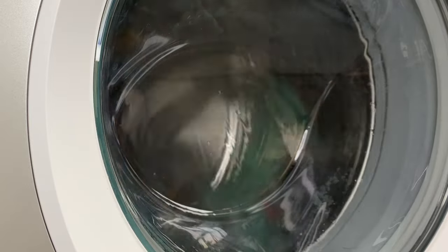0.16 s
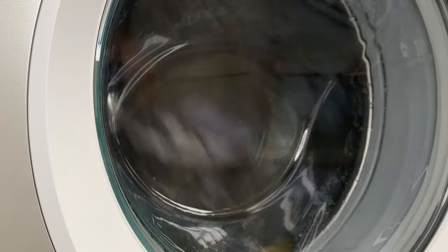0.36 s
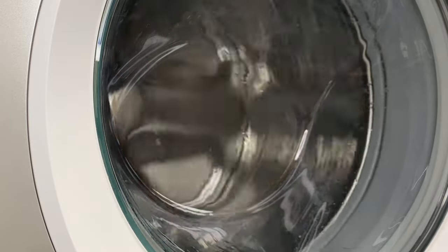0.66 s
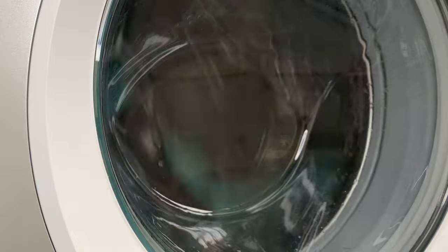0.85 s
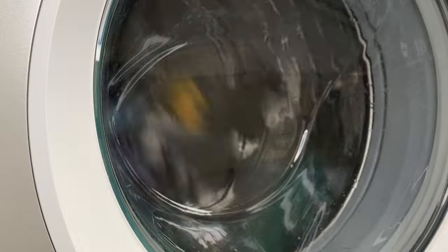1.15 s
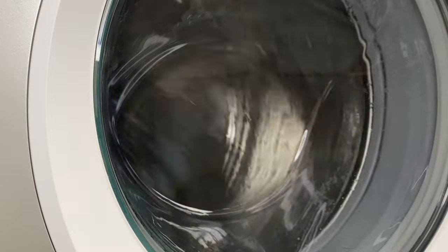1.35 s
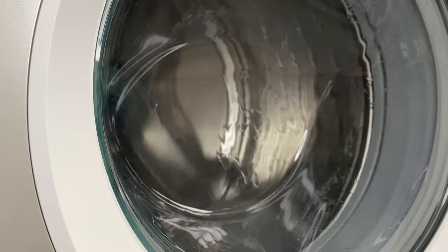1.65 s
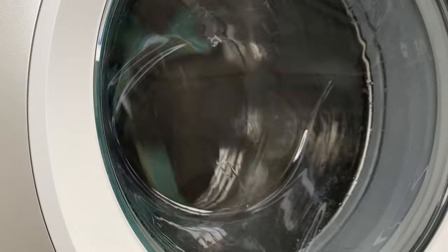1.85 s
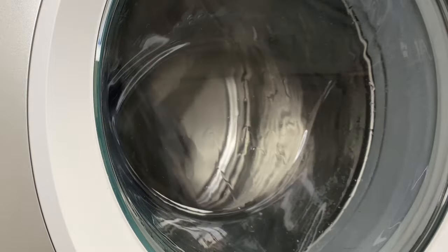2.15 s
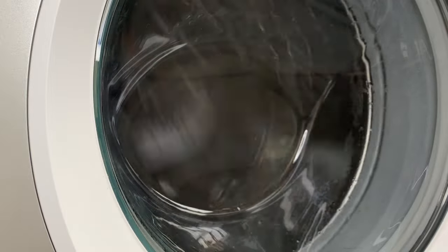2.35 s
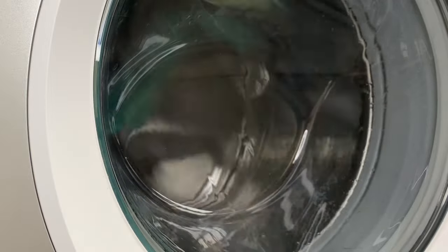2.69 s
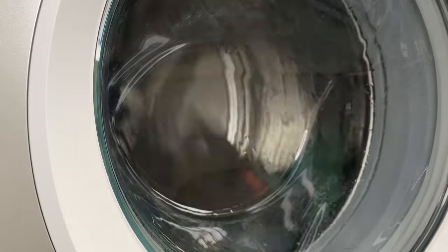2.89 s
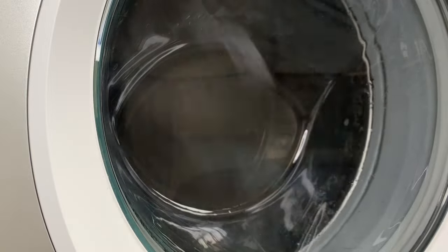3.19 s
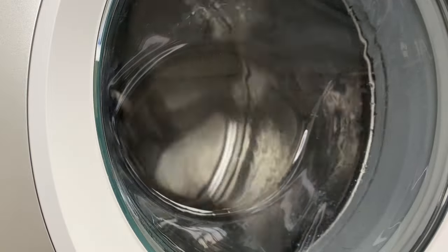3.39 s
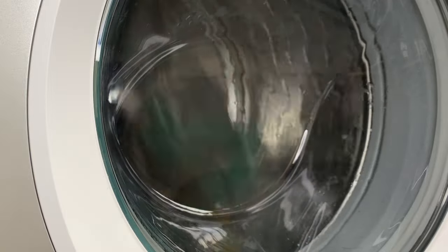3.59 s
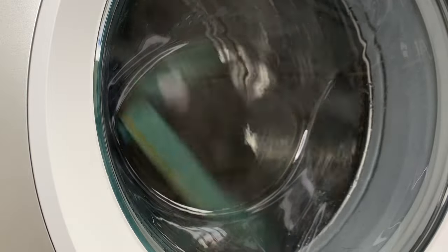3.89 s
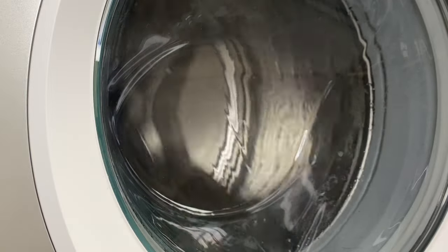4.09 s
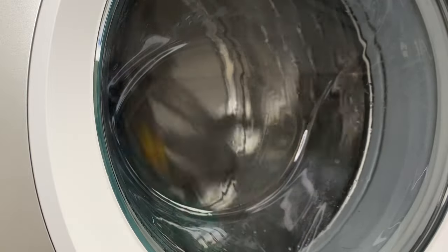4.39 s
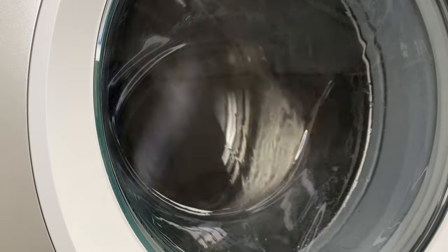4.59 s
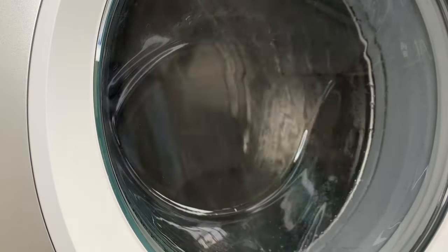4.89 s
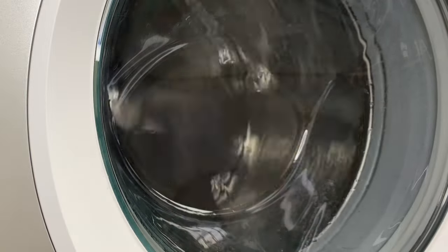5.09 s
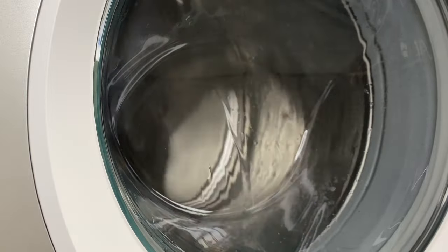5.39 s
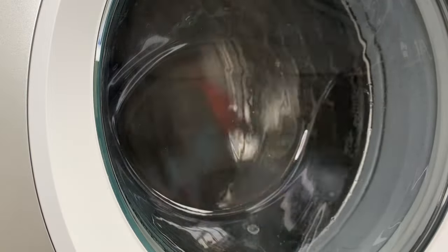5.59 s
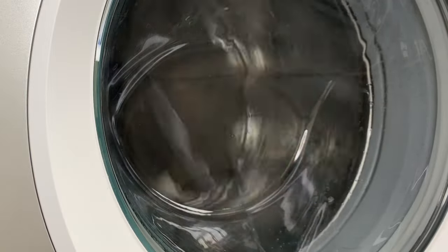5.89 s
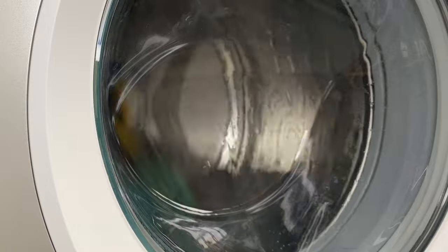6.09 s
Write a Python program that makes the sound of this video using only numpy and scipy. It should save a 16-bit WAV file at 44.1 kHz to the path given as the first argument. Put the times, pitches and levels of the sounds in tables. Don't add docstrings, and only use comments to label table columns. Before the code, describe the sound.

A washing machine is heard from very close to its door, already in mid-wash and continuing throughout about six seconds. A quiet, low motor hum stays constant beneath rolling, hollow water. Paddles lift and tip water a little more than twice a second, giving brief soft hisses of spray. From 0 to 1 second, bundles flop and splash in quick irregular succession. Firm wet slaps land around 1.4 to 1.5 seconds, then a heavy soft surge with a deep thud near 2.0, followed by more sloshing to 2.5. Cloth surges again around 2.8 and 3.3, with a splash near 3.7. Sharper slaps arrive around 4.05, 4.7 and 5.0; the strongest, with a dull low pop, hits near 5.2. Another slap follows at 5.6, and tumbling continues to the end. Bubbles gurgle and droplets plink throughout, while the cabinet rumbles with each lurch.

```python
import sys
import numpy as np
from scipy import signal
from scipy.fft import rfft, irfft, next_fast_len
from scipy.io import wavfile
from scipy.ndimage import uniform_filter1d, map_coordinates

SR = 44100
rng = np.random.default_rng(int(sys.argv[2]) if len(sys.argv) > 2 else 0)


def bounce(signal):
    frames = np.transpose(np.atleast_2d(signal))
    limited = np.clip(frames, -1, 1)
    pcm = np.round(limited * 32767).astype(np.int16)
    wavfile.write(sys.argv[1], SR, pcm)


def field_ratio(decibels):
    return 10 ** (np.asarray(decibels, dtype=float) / 20)


N = 275625

# [f/Hz, width/Hz, level/dB]
MOTOR_MODES = [(50, 32, -8.5), (83.7, 4, -2), (96, 4.7, -15), (155, 18, -1.5), (202.7, 16.4, -2.5)]
# f/Hz, width/Hz, level/dB
DRIVE_WHINE = (10720, 55, -78)
# [t/s, level/dB]
CHURN_LEVEL = [(0, -32.5), (.45, -41), (.66, -43), (0.951, -37), (1.15, -36.5), (1.34, -41), (1.76, -38),
               (2.22, -37), (2.62, -38.5), (3.049, -41), (3.45, -39), (3.8, -36), (4.2, -40.5),
               (4.62, -37.5), (5.02, -36), (5.44, -40), (5.85, -36), (6.25, -41)]
# [t/s, length/s, level/dB]
PADDLE_SHOWERS = [(0, 0.58, -52.5), (0.79, 0.16, -55.5), (1.022, 0.22, -53.5), (1.388, 0.25, -51),
                  (1.788, 0.35, -52.5), (2.261, .27, -48.5), (2.608, 0.28, -54), (3.006, .08, -66),
                  (3.156, .23, -51), (3.49, 0.2, -53), (3.84, 0.309, -53), (4.224, 0.32, -52),
                  (4.666, 0.27, -52.5), (5.021, 0.36, -53), (5.52, 0.29, -58.5), (5.85, 0.34, -51.5)]
# [f/Hz, level/dB per Hz]
MIST_TONE = [(4000, -25), (6000, -3), (7500, 0), (9500, 0), (12200, -2), (12900, -5), (13300, -14),
             (14000, -14), (14600, -13), (15000, -17), (15300, -24), (15700, -22)]
# [f/Hz, level/dB per Hz]
SPRAY_TONE = [(900, -18), (1500, 10), (2000, 6), (3000, 1), (4000, -9), (5200, -11.5), (5700, -16.5),
              (7000, -23), (9000, -42)]
# level/dB of slap, surge, splash
SPIT_LEVEL = (-46.5, -46.5, -43.5)
# t/s of slap, surge, splash
SPIT_RISE = (0.0009, 0.019, 0.01)
# [t/s, level/dB, t60/s]
DRUM_LURCHES = [(0.049, -19.5, 0.22), (0.418, -25.5, 0.49), (0.551, -31.5, 0.32), (0.833, -37, 0.35),
                (1.029, -27, 0.33), (1.419, -23.5, 0.55), (1.528, -26, 0.35), (2.031, -14, 0.38),
                (2.283, -30, 0.45), (2.42, -23.5, 0.63), (2.558, -36.5, 0.44), (2.741, -27, 0.45),
                (3.202, -23.5, 0.51), (3.313, -24, 0.26), (3.504, -32, 0.35), (3.677, -31.5, 0.35),
                (3.904, -23, 0.31), (4.058, -20, 0.23), (4.138, -27, 0.31), (4.31, -33, 0.35),
                (4.769, -25, 0.35), (4.941, -23, 0.29), (5.181, -16.5, 0.49), (5.261, -27, 0.31),
                (5.662, -24, 0.35), (5.88, -23, 0.35), (6.061, -21, 0.39), (6.138, -31, 0.3)]
# [f/Hz, width/Hz, level/dB]
CABINET_MODES = [(62, 14, -8), (79.5, 8, 0), (99.5, 6, 0), (125, 9, -10)]
# [f/Hz, width/Hz, level/dB]
TUB_MODES = [(160, 11, -7), (195, 30, -10), (227, 13, 0), (282, 14, -5), (327, 15, -6)]
# [f/Hz, width/Hz, level/dB]
DOOR_MODES = [(376, 25.7, -1.5), (460.3, 44.5, 0.5), (567, 40.7, -0.5), (615.4, 22.5, 1.5), (700, 39, -2.5),
              (758, 28, -1.5), (845, 58, -3.5), (947.5, 45, -1), (1029, 32, -3), (1110.6, 28, -2.5),
              (1254, 193, -8), (1593, 370, -16)]
# [t/s, level/dB, trapped air f/Hz, t60/s]
WATER_SHEETS = [(.059, -24.5, 506, .28), (.199, -14.5, 850, 0.14), (.498, -15.5, 840, 0.13),
                (.531, -20.5, 664, 0.19), (.825, -19, 1115, .25), (.97, -26.5, 700, 0.067),
                (1.15, -37, 700, .3), (1.411, -14, 1440, 0.21), (1.629, -16, 748, 0.25),
                (1.713, -32.5, 420, 0.13), (1.79, -30.5, 825, 0.46), (1.888, -21.5, 636, 0.35),
                (2.29, -16.5, 1240, 0.24), (2.53, -21.5, 600, 0.16), (2.992, -25, 997, 0.41),
                (3.16, -26.5, 700, 0.39), (3.596, -19, 593, 0.25), (3.64, -28, 700, 0.31),
                (3.679, -14.5, 551, 0.17), (3.83, -27, 700, 0.75), (3.999, -19.5, 374, 0.36),
                (4.26, -16, 700, 0.15), (4.446, -17, 1286, 0.23), (4.53, -21, 700, 0.16),
                (4.789, -18, 580, 0.27), (4.849, -17.5, 608, 0.23), (5.1, -24, 700, 0.56),
                (5.52, -25.5, 800, 0.9), (5.73, -21.5, 700, 0.12), (5.787, -31, 702, 0.099)]
# [t/s, level/dB, trapped air f/Hz, tub thud level/dB, t60/s]
CLOTH_SURGES = [(.029, -17.5, 429, -21, 0.56), (.389, -22.5, 800, -2, 0.54), (.849, -14, 585, -15, 0.11),
                (1.018, -15, 561, -2.5, 0.23), (1.095, -19, 403, -3, 0.07), (1.959, -14.5, 385, -24, 0.15),
                (1.998, -13.5, 590, 4, 0.29), (2.029, -16, 416, -35, 0.22), (2.139, -16, 410, -11, 0.17),
                (2.207, -21, 530, -14, .2), (2.329, -36.5, 401, 20, 0.84), (2.389, -15, 645, -23, 0.29),
                (2.429, -13, 566, -11.5, 0.27), (2.76, -28, 600, -8, 0.75),
                (2.849, -15.5, 570, -13.5, 0.18), (3.259, -14, 600, -7, 0.43),
                (3.309, -13.5, 611, -14, 0.17), (3.879, -15.5, 693, -6, 0.27),
                (4.302, -14, 915, -1.5, 0.21), (4.42, -16, 880, -26, 0.083), (4.489, -21, 410, -5, 0.41),
                (5.312, -12.5, 601, -11, 0.25), (5.65, -15, 506, -5, 0.18), (6.099, -15, 1006, -24, 0.24)]
# [t/s, level/dB, trapped air f/Hz, tub thud level/dB, t60/s]
HARD_SLAPS = [(0.097, -18, 408, 1, 0.15), (.284, -18, 700, -22, 0.092), (.342, -20.5, 945, -6.5, 0.46),
              (.812, -19.5, 700, -5, 0.49), (1.212, -24.5, 780, -6, 0.66), (1.402, -14, 885, -6, 0.097),
              (1.521, -11, 1013, -3, 0.2), (2.295, -19.5, 387, 4, 0.087), (2.668, -27, 476, -20, 0.18),
              (2.7, -20.5, 885, -26, 0.18), (3.187, -14.5, 969, -7, 0.24), (4.049, -14.5, 910, -5, 0.19),
              (4.226, -25, 408, 3, 0.44), (4.687, -16.5, 940, 0, 0.33), (4.933, -19.5, 710, 0.5, 0.18),
              (5.032, -12, 986, -3, 0.096), (5.174, -7, 355, -1, 0.18), (5.197, -34, 353, 3.5, 0.19),
              (5.58, -11.5, 963, -1, 0.22), (5.867, -17, 966, -6, 0.39), (6.029, -21.5, 743, 3, 0.47)]
# [f/Hz, likeness/0-1]
PORT_LIKENESS = [(60, 0.97), (130, 1), (250, 0.92), (400, 0.12), (800, 0.48), (1300, 0.37), (1800, 0.15),
                 (3000, 0.47), (4700, 0.38), (5700, 0.81), (7000, 0.11), (8000, 0.77), (15000, 0.59)]
# [f/Hz, level/dB]
PORT_BALANCE = [(100, 0.5), (250, 2), (680, 6.5), (1000, 3.5), (2300, 0.5), (3200, 2.5), (3900, 10),
                (5200, 8), (6000, 7.5), (7300, 1.5), (8200, 1.5)]
# [f/Hz, phase/rad]
PORT_LEAD = [(50, 0), (260, .35), (600, 2.1), (1400, 2.3), (2200, 5.6), (3000, 7.4), (4800, 7.4),
             (6200, 6.1), (7200, 4.9), (8250, 3.14), (9300, 1.9), (10200, .95), (11000, 0), (12050, -1.5),
             (13200, -3.14), (14200, -3.6), (15300, -6.28)]

PADDLE_HZ, PADDLE_S, PADDLE_DB = 2.44, 1.36, 2
CHURN_MEAN_DB = -38
SHAKE_DB, SHAKE_GROWS = -39.5, 0.39
DRUM_DB, DRUM_GROWS = -38.5, 1.9
SLOSH_DB, SLOSH_GROWS = -34.5, 1.06
HISS_DB, HISS_GROWS = -55, 0.28
SUDDEN_S, SOFT_S, LURCH_RISE_S = .001, .02, .015
POUR_S, DRAIN_S = 0.013, 0.03
DAMP_DB = -58.5
SPIT_GROWS = 0.86
SPLASH_THUD_DB = -14.5
SPLASH_DOOR_DB = 1


def along(points, hz):
    f, v = np.transpose(points)
    return np.interp(np.log(hz + 1), np.log(f + 1), v)


def wobble(rate):
    knots = rng.standard_normal(int(N * rate / SR) + 4)
    return map_coordinates(knots, [np.arange(N) * rate / SR])


def filtered(x, response):
    m = next_fast_len(N + SR // 2)
    return irfft(rfft(x, m) * response(np.fft.rfftfreq(m, 1 / SR)), m)[..., :N]


def modes(rows):
    def response(f):
        total = 0
        for k, (centre, width, db) in enumerate(rows):
            damping = 1j * f * width
            total = total + (-1) ** k * field_ratio(db) * damping / (centre * centre - f * f + damping)
        return total
    return response


def clumped(patchy_db):
    z = signal.stft(rng.standard_normal((2, N)), nperseg=512)[2]
    field = uniform_filter1d(rng.standard_normal(z.shape[1:]), size=4, axis=0)
    field = uniform_filter1d(field, size=6, axis=1)
    noise = signal.istft(z * field_ratio(patchy_db * field / field.std()), nperseg=512)[1][:, :N]
    return noise / noise.std()


def shaken(force, response, lumpy_db, lump_hz, kicks=0, patchy_db=0):
    lumps = field_ratio(lumpy_db * wobble(lump_hz))
    drive = force * lumps / np.sqrt(np.mean(lumps ** 2)) * clumped(patchy_db)
    power = np.mean(np.abs(response(np.linspace(1, SR / 2, 40000))) ** 2)
    return filtered(drive + kicks, response) / np.sqrt(power)


def blows(when, db, t60s, rises):
    force, t = np.zeros(N + SR), np.arange(SR // 2) / SR
    for s, level, t60, rise in zip(when, db, t60s, rises):
        start = max(round((s - rise) * SR), 0)
        fall = field_ratio(level - 60 * t / max(t60, .02))
        force[start:][:len(t)] += fall * (1 - np.exp(-(t / rise) ** 2))
    return force[:N]


def kicks_at(rows, db, length, area):
    kicks = np.zeros(N)
    kicks[(np.transpose(rows)[0] * SR).astype(int)] = field_ratio(db)
    return np.convolve(kicks, np.hanning(length) / area)[:N]


def first_contact(db):
    return kicks_at(HARD_SLAPS, db[:len(HARD_SLAPS)], 14, 6)


def bubbles(s, hz, db, cycles):
    t = np.arange(SR // 10) / SR
    u = t * (hz / cycles)[:, None]
    tone = np.sin(2 * np.pi * hz[:, None] * t * (1 + .004 * u))
    ring = field_ratio(db)[:, None] * u * np.exp(1 - u) * tone
    at = (s[:, None] * SR).astype(int) + np.arange(len(t))
    return np.bincount(at.ravel(), ring.ravel(), N + SR)[:N]


def gurgle(level_db, centre_hz, cycles, count):
    paths = []
    for _ in range(2):
        s = rng.uniform(0, N / SR, count)
        hz = centre_hz * np.exp(0.325 * rng.standard_normal(count))
        db = level_db[(s * SR).astype(int)] + 3.5 * rng.standard_normal(count)
        paths.append(bubbles(s, hz, db, cycles))
    return np.array(paths)


def churn():
    t = np.arange(N) / SR
    rolling = np.interp(t, *np.transpose(CHURN_LEVEL)) - CHURN_MEAN_DB
    return rolling - PADDLE_DB * np.cos(2 * np.pi * PADDLE_HZ * (t - PADDLE_S))


def load():
    loose = [(s, db, hz, SPLASH_THUD_DB, t60) for s, db, hz, t60 in WATER_SHEETS]
    when, db, air_hz, thud_db, t60 = np.transpose(HARD_SLAPS + CLOTH_SURGES + loose)
    kind = np.repeat(np.arange(3), [len(HARD_SLAPS), len(CLOTH_SURGES), len(WATER_SHEETS)])
    spit_db = np.take(SPIT_LEVEL, kind) + SPIT_GROWS * (db + 17.5)
    return when, db, air_hz, db + thud_db, spit_db, t60, kind


def showers():
    t, rain = np.arange(N) / SR, np.zeros(N)
    for s, length, db in PADDLE_SHOWERS:
        corners = [s - POUR_S, s, s + length, s + length + DRAIN_S]
        rain += field_ratio(db) * np.interp(t, corners, [0, 1, 1, 0]) ** 2
    return rain


def motor():
    return shaken(field_ratio(-42.5), modes(MOTOR_MODES), lumpy_db=-0.4, lump_hz=3.24)


def whine(hanging):
    hz, width, db = DRIVE_WHINE
    return shaken(field_ratio(db) * hanging, modes([(hz, width, 0)]), lumpy_db=2.5, lump_hz=6)


def hanging_mist(rain, spit):
    fine = np.sqrt(field_ratio(DAMP_DB) ** 2 + rain ** 2 + (field_ratio(-4.0) * spit) ** 2)
    return (uniform_filter1d(fine, size=500, origin=240) / field_ratio(-53.5)) ** 1.06


def mist(hanging):
    return shaken(field_ratio(-62) * hanging, lambda f: field_ratio(along(MIST_TONE, f)),
                  lumpy_db=1.6, lump_hz=14, patchy_db=3.0)


def spray(wet):
    return shaken(field_ratio(7.5) * wet, lambda f: field_ratio(along(SPRAY_TONE, f)),
                  lumpy_db=0.82, lump_hz=92.0, patchy_db=2.0)


def cabinet(churn_db):
    jolts = blows(*np.transpose(DRUM_LURCHES), [LURCH_RISE_S] * len(DRUM_LURCHES))
    force = np.hypot(field_ratio(SHAKE_DB + SHAKE_GROWS * churn_db), field_ratio(-7.5) * jolts)
    shoves = kicks_at(DRUM_LURCHES, np.transpose(DRUM_LURCHES)[1] + 25, 240, 120)
    return shaken(force, modes(CABINET_MODES), lumpy_db=-2.0, lump_hz=24.96, kicks=shoves)


def tub(churn_db, when, thud_db, t60, rises):
    thuds = blows(when, thud_db - 5.0, 0.88 * t60, rises)
    force = np.hypot(field_ratio(DRUM_DB + DRUM_GROWS * churn_db), thuds)
    return shaken(force, modes(TUB_MODES), lumpy_db=1.5, lump_hz=38.65,
                  kicks=first_contact(thud_db + 16))


def door(splashes, slap_db):
    return shaken(splashes, modes(DOOR_MODES), lumpy_db=1.0, lump_hz=69.46, patchy_db=2.0,
                  kicks=first_contact(slap_db + 6.5))


def water(splashes, wet):
    slosh = gurgle(20 * np.log10(splashes) - 7.5, centre_hz=749, cycles=1.75, count=700)
    droplets = gurgle(20 * np.log10(wet) - 1.5, centre_hz=2120, cycles=3.4, count=260)
    return slosh + droplets


def pops(when, air_hz, slap_db, kind):
    cycles = np.where(kind == 0, 4, 5)
    shut_db = np.where(kind == 0, -9, -13.5)
    return bubbles(when, air_hz, slap_db + shut_db, cycles)


def scene():
    churn_db = churn()
    when, slap_db, air_hz, thud_db, spit_db, t60, kind = load()
    rises = np.where(kind == 0, SUDDEN_S, SOFT_S)
    calm = field_ratio(HISS_DB + HISS_GROWS * churn_db)
    rain = showers()
    spit = blows(when, spit_db, 0.98 * t60, np.take(SPIT_RISE, kind))
    wet = np.sqrt(calm ** 2 + (field_ratio(-4.5) * rain) ** 2 + spit ** 2)
    hanging = hanging_mist(rain, spit)
    hits = blows(when, slap_db - 8 + SPLASH_DOOR_DB * (kind == 2), t60, rises)
    splashes = np.hypot(field_ratio(SLOSH_DB + SLOSH_GROWS * churn_db), hits)
    machine = motor() + whine(hanging) + cabinet(churn_db)
    machine += tub(churn_db, when, thud_db, t60, rises) + door(splashes, slap_db)
    wash = mist(hanging) + spray(wet) + water(splashes, wet)
    return machine + wash + pops(when, air_hz, slap_db, kind)


def thinned(left, right, under_db, faint_db, hole_db, jump_db):
    size, first, lead_in = 32, 320, 972
    window = np.sin(np.pi * (np.arange(2048) + .5) / 2048)
    pair = np.pad([left + right, left - right], ((0, 0), (lead_in, 0))) / 2
    z = signal.stft(pair, window=window, nperseg=2048)[2]
    bands = z[:, first:1024].reshape(2, -1, size, z.shape[2])
    level = 10 * np.log10(np.mean(np.abs(bands) ** 2, axis=2) + 1e-20)
    level += .7 * rng.standard_normal(level.shape)
    loudest = level.max(axis=0)
    attack = np.diff(loudest[:8].mean(axis=0), prepend=0) > jump_db
    keep = ((level > loudest - under_db) | attack) & (level > faint_db)
    z[:, first:1024] *= np.repeat(keep, size, axis=1)
    z *= uniform_filter1d(np.abs(z), size=3, axis=1) > field_ratio(hole_db)
    mid, side = signal.istft(z, window=window, nperseg=2048)[1][:, lead_in:lead_in + N]
    return np.array([mid + side, mid - side])


def band_limit(x):
    return signal.sosfilt(signal.butter(12, 15750, fs=SR, output="sos"), x)


def record(dry):
    def like(f):
        return np.clip(along(PORT_LIKENESS, f), 0, 1)

    def port(f, side):
        low_cut = (f < 15750) * (1j * f / 45) ** 2 / (1 + 1.4j * f / 45 - (f / 45) ** 2)
        return low_cut * field_ratio(side * along(PORT_BALANCE, f) / 2)

    left = filtered(dry[0], lambda f: port(f, 1))
    shared = filtered(dry[0], lambda f: port(f, -1) * like(f) * np.exp(-1j * along(PORT_LEAD, f)))
    own = filtered(dry[1], lambda f: port(f, -1) * np.sqrt(1 - like(f) ** 2))
    mix = thinned(left, shared + own, under_db=4.3, faint_db=-101.5, hole_db=-99, jump_db=6.5)
    return band_limit(mix)


dry = scene()
out = record(dry)
bounce(out)
```